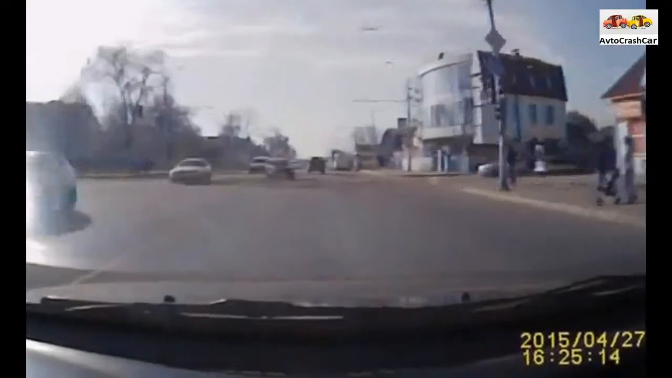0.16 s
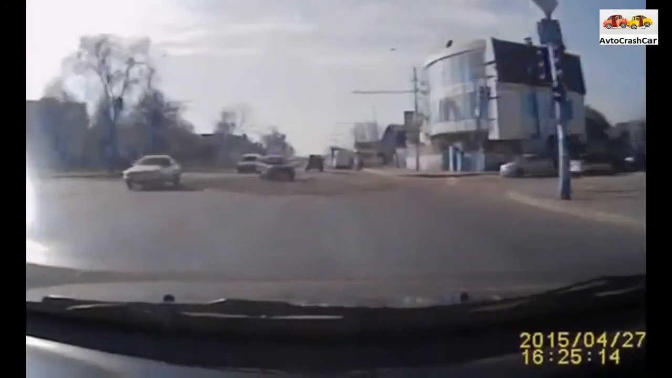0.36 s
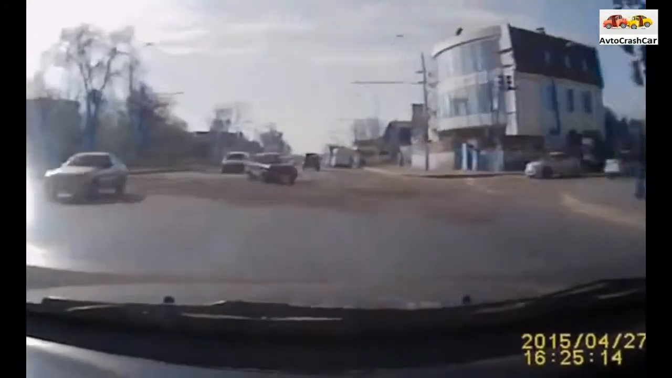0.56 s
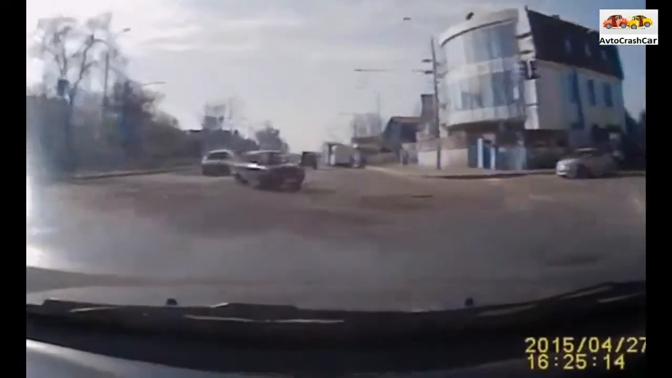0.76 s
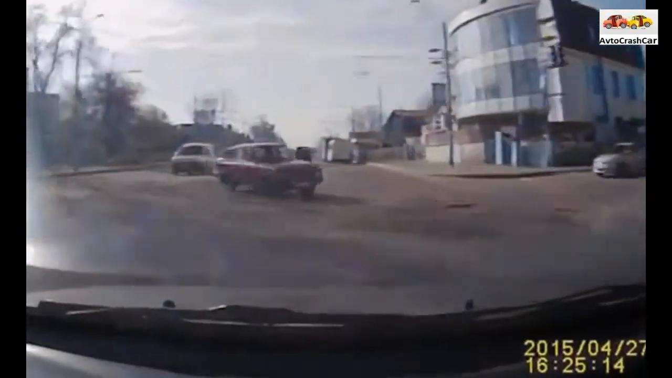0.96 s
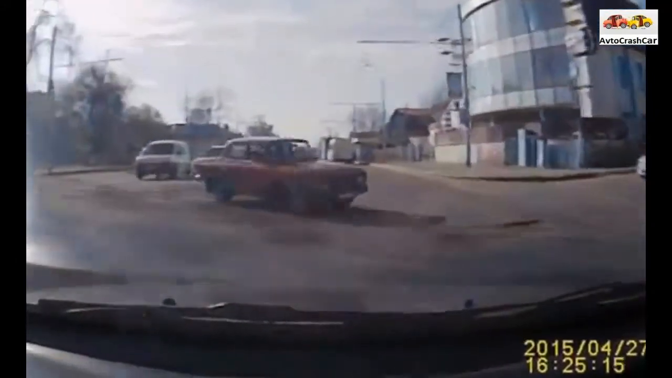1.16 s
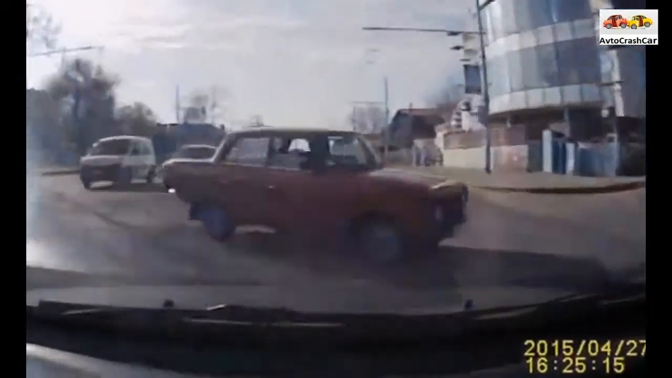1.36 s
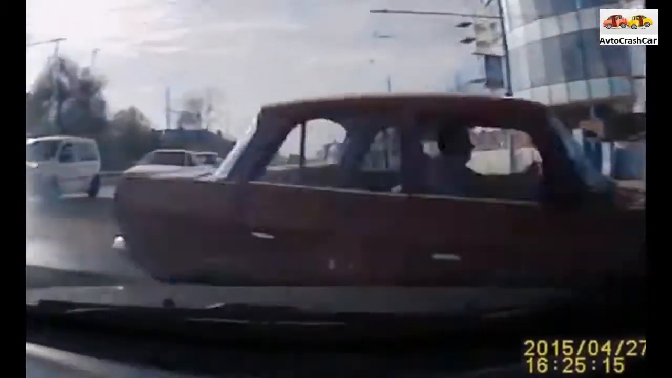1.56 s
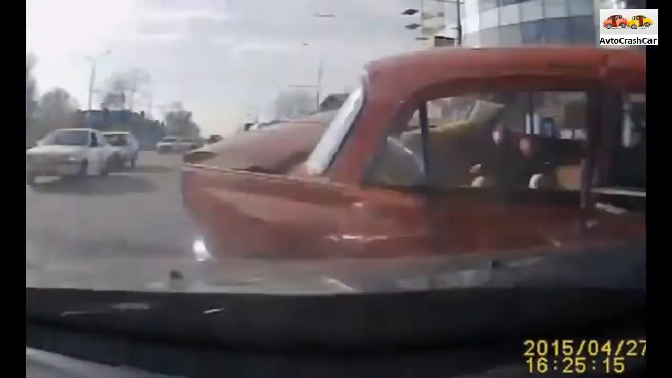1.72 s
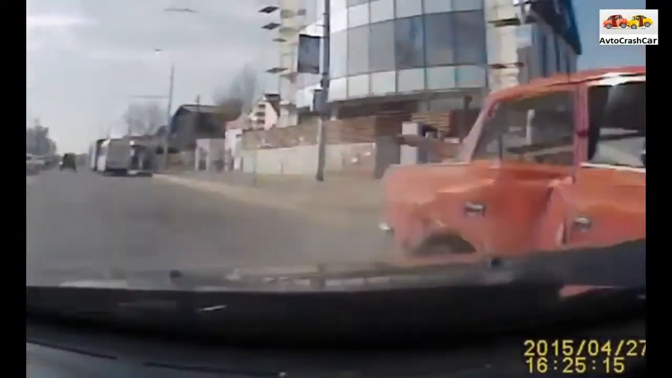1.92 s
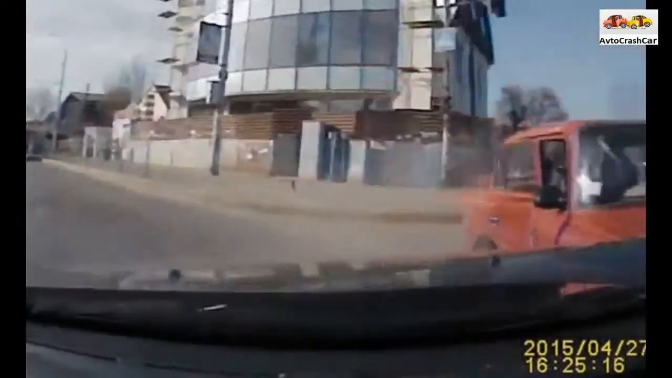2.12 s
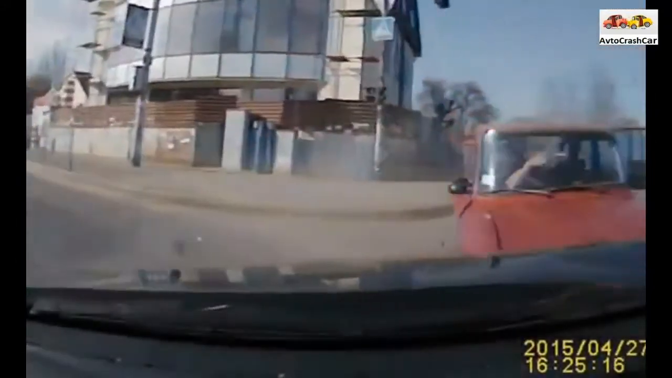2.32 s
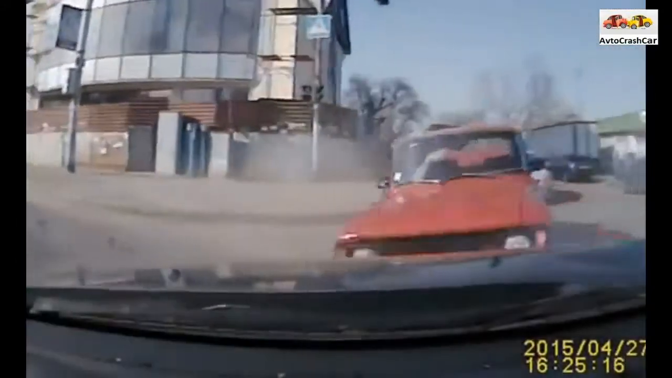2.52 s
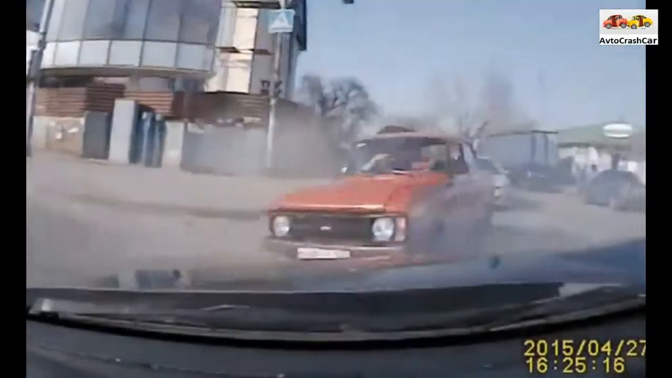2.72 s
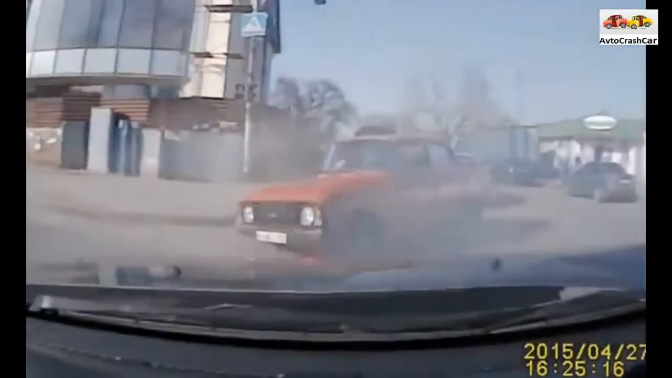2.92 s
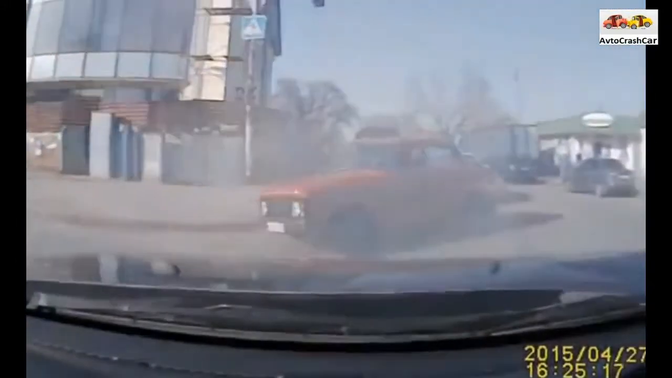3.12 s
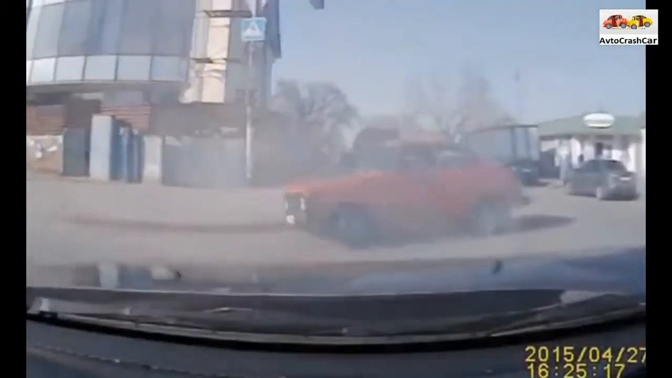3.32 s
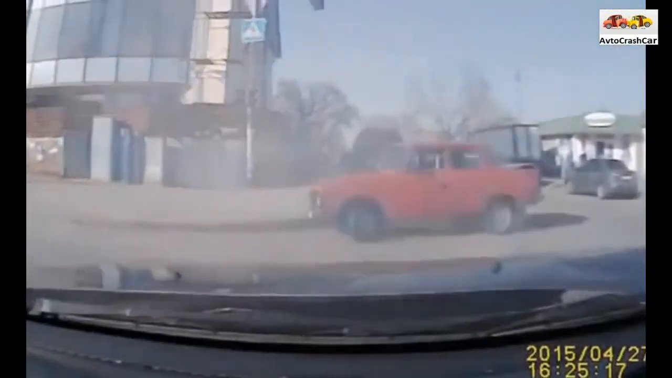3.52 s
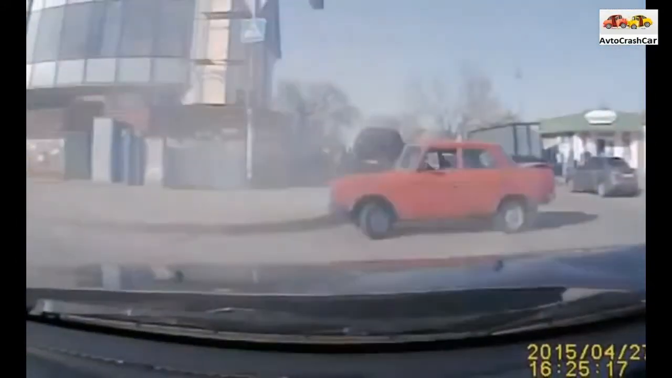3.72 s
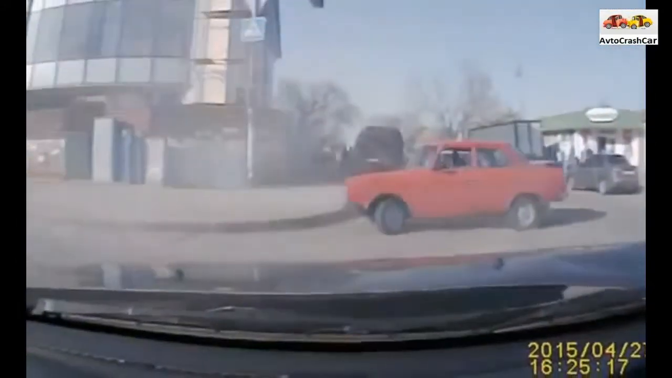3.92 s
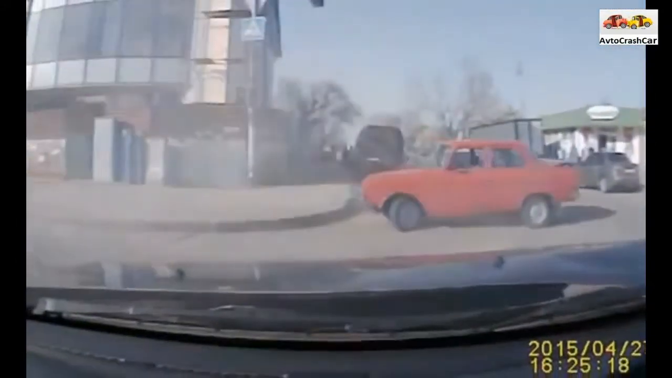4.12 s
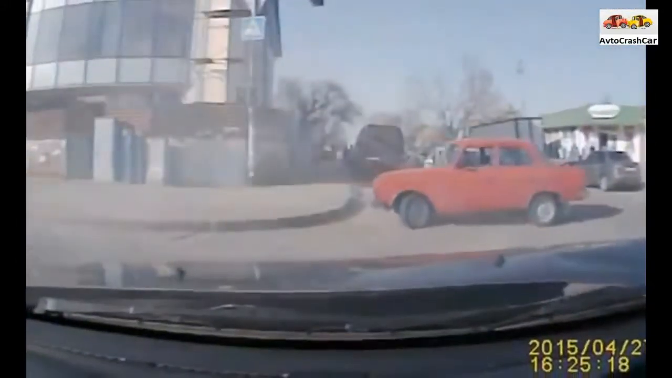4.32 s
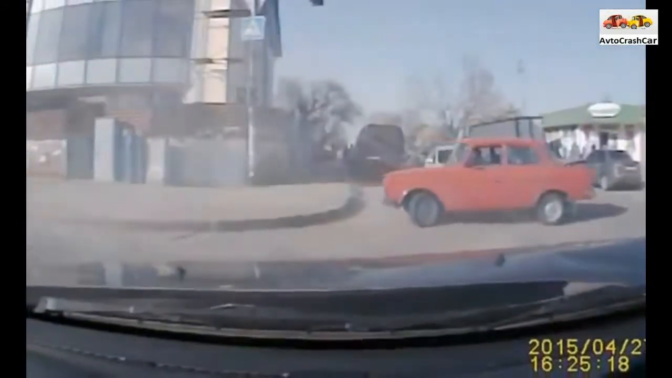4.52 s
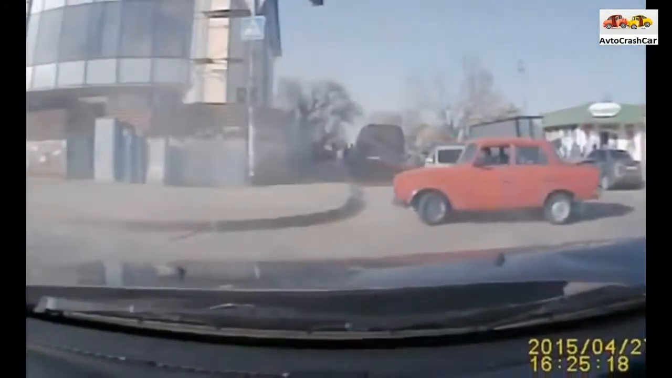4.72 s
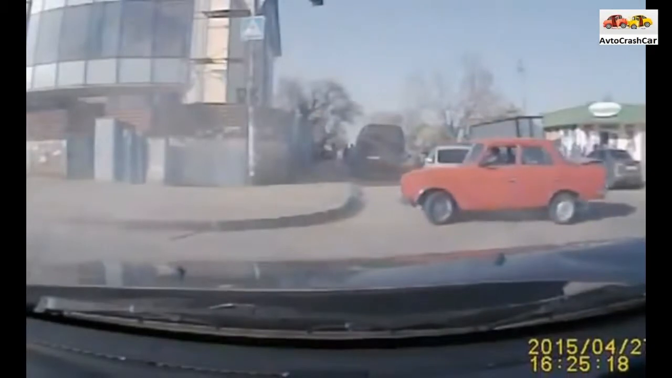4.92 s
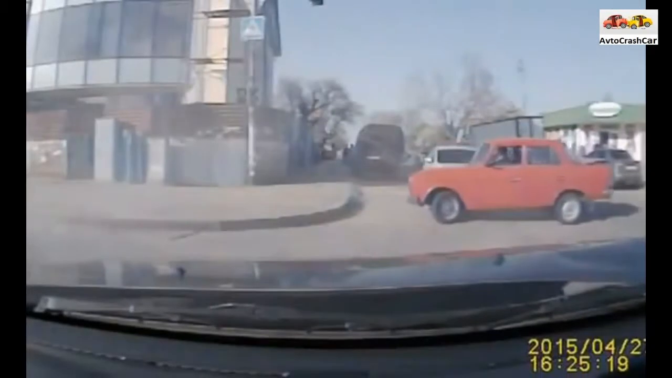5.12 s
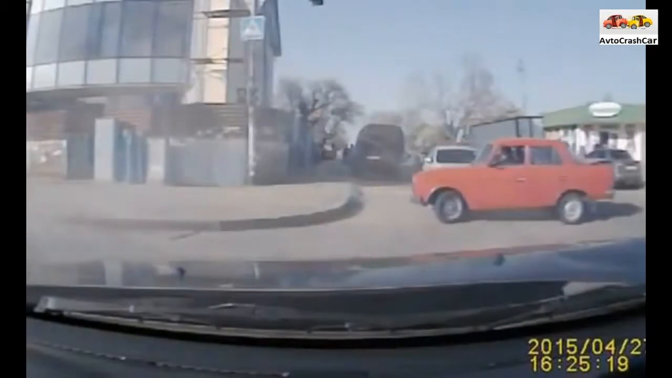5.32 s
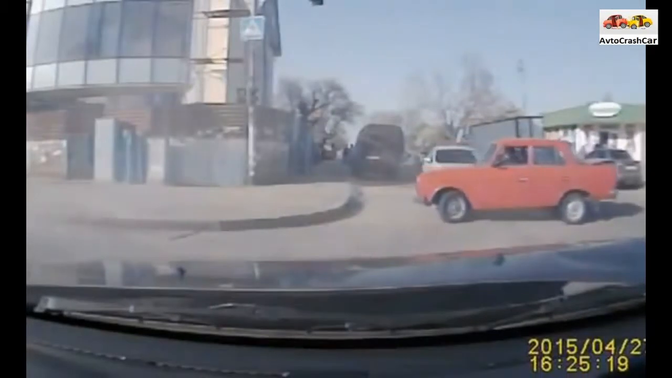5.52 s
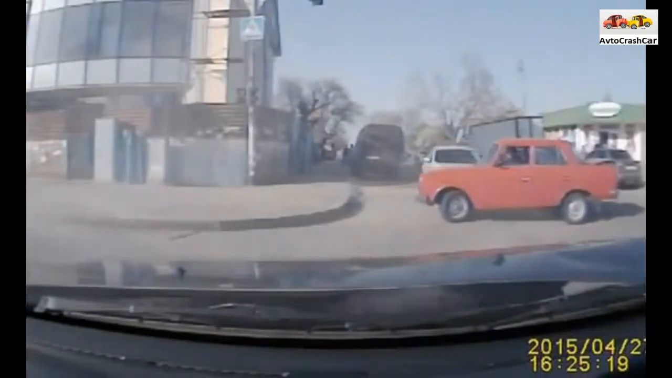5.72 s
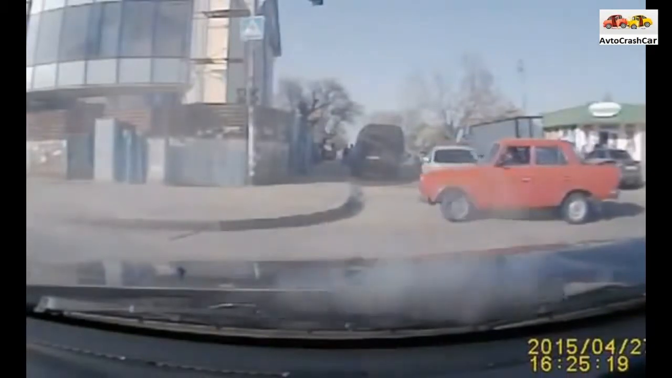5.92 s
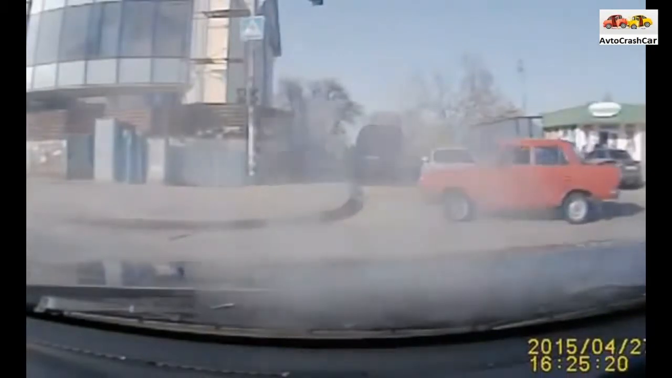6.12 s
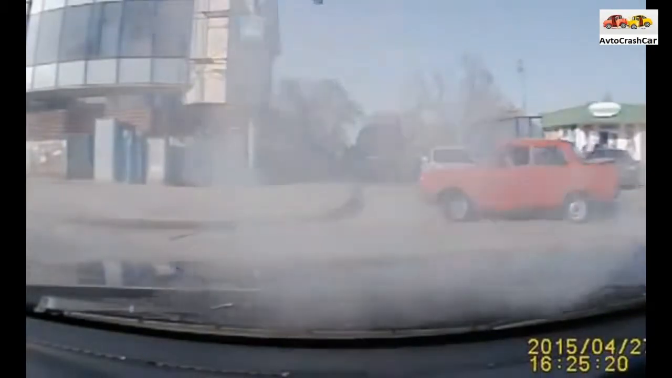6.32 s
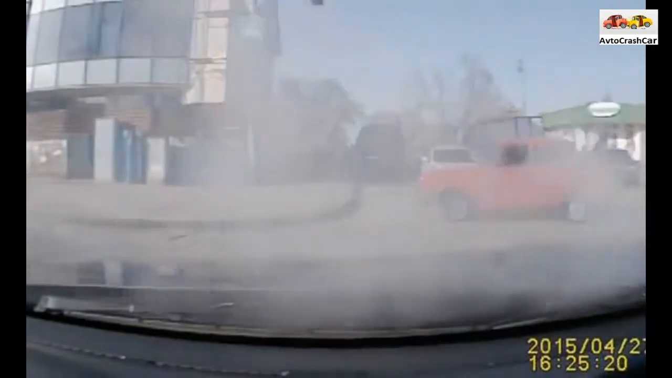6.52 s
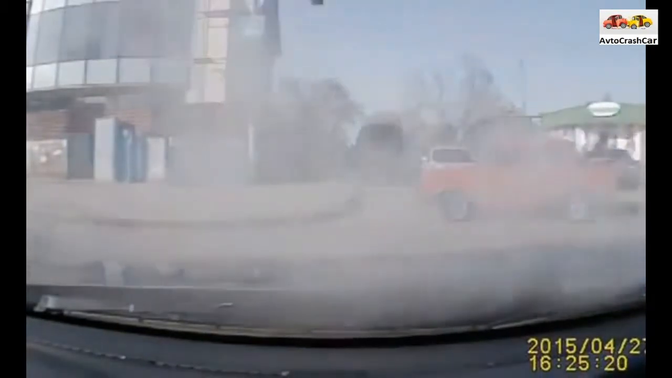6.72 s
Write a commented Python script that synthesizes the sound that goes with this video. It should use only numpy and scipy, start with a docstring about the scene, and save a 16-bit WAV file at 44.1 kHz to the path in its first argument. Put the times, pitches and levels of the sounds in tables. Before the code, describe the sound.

Tyres screech and a horn blares, then a distorted car crash with rattling debris, heard from inside the car as it stops.

```python
"""Screeching tyres and a crash, heard inside a car that brakes hard, skids and hits another car.
The rubber sticks and slips over the road's roar while a horn sounds; then panels crunch, debris rattles.
The noise overloads a small dashboard microphone, and the crash's pressure wave pins it to one side,
so the crunch comes through in spits. The car rolls to a stop with its engine idling and its fan blowing;
at last a door creaks and unlatches."""
import sys
import numpy as np
from scipy import signal
from scipy.fft import rfft, irfft
from scipy.io import wavfile

SR = 44100
rng = np.random.default_rng(int(sys.argv[2]) if len(sys.argv) > 2 else 0)


def wav_out(sig):
    """Save sig, one row per channel (or a flat mono array), as 16-bit PCM at SR to the path in sys.argv[1]."""
    wavfile.write(sys.argv[1], SR, np.round(np.clip(np.atleast_2d(sig).T, -1, 1) * 32767).astype(np.int16))


N = 302967
T = np.arange(N) / SR
FREQS = np.maximum(np.fft.rfftfreq(N, 1 / SR), 1)
BAND_HZ, CUTOFF_HZ = 8100, 15500   # top of the recorder's band; top of the overload's fizz

# The tyres slide. Each row: start in seconds, length in seconds, level in dB, pitch in Hz.
SLIDES = [(0, 0.17, -23, 1096), (.67, 0.97, 0, 1190), (1.92, .35, -4, 1129), (2.35, 0.45, -15.5, 1083),
          (2.78, 0.19, -12.5, 1135), (2.98, 0.27, -16.5, 1148)]
# The four tyres. Each row: pitch as a multiple of the slide's pitch, level in dB.
TYRES = [(.87, -4), (.98, -6.5), (1.07, -2), (1.17, -5.5)]
# Bodywork crumples. Each row: start and length in seconds, level in dB, seconds to fade by 60 dB.
CRUMPLES = [(1.619, 0.03, 5, 0.052), (1.728, .028, 12, 0.061), (1.78, 0.015, 12, 0.032),
            (1.817, 0.016, 19, 0.032), (1.846, 0.047, 14.5, .02), (1.905, 0.059, 7.5, 0.89),
            (2.255, 0.12, 0, 0.09)]
# The tone of the crunch. Each row: frequency in Hz, level in dB.
CRUNCH_COLOUR = [(40, 6.5), (200, 0.5), (500, 4), (1100, 6.5), (1700, 1.5), (2700, -6), (4300, -15),
                 (5700, -13), (8000, -23.5)]
# Road roar swells under braking and dies as the car slows. Each row: time in seconds, level in dB.
ROAD_LEVEL = [(0, -9), (.35, -12), (1.3, -0.5), (1.6, -7.5), (2.35, -4.5), (2.45, -12), (3.0, -23),
              (3.3, -29), (3.45, -23), (3.65, -36.5), (4.6, -35), (6.87, -52)]
# The tone of the road. Each row: frequency in Hz, level in dB.
ROAD_COLOUR = [(20, -4.5), (40, -9), (100, -11.5), (165, -8.5), (250, -7.5), (400, -7.5), (540, -4.5),
               (800, -1.5), (1130, -0.5), (1450, -6.5), (1700, -13), (2150, -15.5), (4200, -40),
               (8000, -35.5)]
# Horn tones that get through the glass. Each row: diaphragm (0 or 1), multiple of its pitch, level in dB.
HORN_PARTIALS = [(0, 1, -5.5), (0, 2, -17), (0, 4, -6), (0, 5, -8.5), (1, 2, 2.5), (1, 3, -2.5),
                 (1, 5, -6.5), (1, 6, -16), (1, 7, -19)]
# Jolts of the body and loose trim. Each row: start and length in seconds, level in dB, treble lift in dB.
KNOCKS = [(0.273, 0.011, 2.5, -20), (0.869, 0.041, -4.5, 13), (.938, .003, -3.5, 14),
          (1.317, 0.0064, 3.5, -19), (1.404, 0.0027, -4, 10), (1.908, .008, 4.5, 16), (2.143, 0.0047, 4, 3),
          (2.39, .002, -8, 7), (2.448, 0.0023, -9, -3), (2.553, 0.0025, 1.5, 8), (2.586, .003, -1.5, 7),
          (2.722, 0.018, -10, 7), (3.066, 0.0053, -10.5, -22), (3.133, 0.024, -13.5, 1),
          (3.175, 0.02, -9.5, -0.5), (3.327, 0.027, -13.5, -8), (3.363, 0.012, 2, -1.5),
          (3.39, 0.057, -21.5, 3), (3.546, 0.0062, -11, -24), (3.954, 0.018, -20.5, -0.5),
          (5.586, 0.066, -28.5, 1.5), (6.063, 0.028, -26, 4), (6.131, 0.012, -17.5, 3),
          (6.625, .002, -21.5, -4)]
# The tone of the jolts. Each row: frequency in Hz, level in dB.
KNOCK_COLOUR = [(30, -13), (70, -17), (120, -8.5), (230, -1), (400, 3.5), (700, 5), (1100, 5.5),
                (1700, -0.5), (2400, -6.5), (3300, -10), (4400, -22.5), (5900, -19), (8000, -28.5)]
# Thumps of the suspension and body. Each row: start in seconds, level in dB, middle pitch in Hz.
THUMPS = [(0.778, -4, 165), (.875, 2.5, 177), (3.332, -10.5, 480), (3.364, -2.5, 429), (3.367, -12, 99),
          (3.958, -34, 201), (6.076, -24, 265), (6.141, -23, 334), (6.418, -30, 229)]
# The tone of the rattle. Each row: frequency in Hz, level in dB.
RATTLE_COLOUR = [(300, -7), (1200, 7), (3000, 0.5), (8000, -17.5)]
# Large glass shards land. Each row: start in seconds, level in dB, pitch in Hz.
SHARDS = [(2.139, -2, 6100), (2.557, 7.5, 5810), (2.624, -15, 5830), (2.866, -19, 5916),
          (3.132, -18.5, 5920)]
# The door creaks. Each row: start in seconds, length in seconds, level in dB.
CREAKS = [(5.557, 0.093, -27.5), (5.6, .01, -14.5), (5.655, 0.031, -25)]
# The latch snaps open. Each row: start in seconds, level in dB.
LATCH_CLICKS = [(6.113, -31), (6.134, -21), (6.141, -14.5), (6.148, -19)]
# The latch's ringing tones. Each row: pitch in Hz, level in dB, seconds to fade by 60 dB.
LATCH_TONES = [(1580, -15, 0.034), (2064, 1.5, 0.037), (2400, -11, 0.022), (3230, -6, 0.03),
               (3470, -7, 0.019), (4700, -8, 0.013)]
# The engine sinks to idle. Each row: time in seconds, firings per second.
ENGINE_SPEED = [(3.5, 36), (4.2, 34), (4.45, 31), (4.8, 30.3)]
# The engine's tones. Each row: multiple of the firing rate, level in dB.
ENGINE_TONES = [(1, 0.5), (2, -25), (3, -25.5), (4, -15.5), (5, -3.5), (7, -9), (12, 0.5)]
# The rush of the fan. Each row: time in seconds, level in dB.
FAN_LEVEL = [(0, -20), (3.5, -20.5), (4.2, -25), (5.2, -26), (6.87, -26)]
# The tone of the fan. Each row: frequency in Hz, level in dB.
FAN_COLOUR = [(26, -35.5), (45, -16), (117, -27), (145, -11.5), (176, -21), (205, -13), (411, -8),
              (499, -8.5), (676, -7), (1020, -2.5), (1480, -7), (1870, -20.5), (2180, -19), (4090, -35.5),
              (8000, -38)]
# The whine of the electrics. Each row: pitch in Hz, level in dB.
WHINE_TONES = [(3098, -59), (3128, -56.5), (6654, -63.5), (7757, -79)]
# Resonances of the cabin and dashboard. Each row: frequency in Hz, width in Hz, full lift in dB.
CABIN = [(148, 38, 5.5), (506.4, 35, 7), (1034, 54, 4.5), (1188, 69, 4.5), (1750, 390, -0.5),
         (2070, 52, 4.5), (3130, 83, 4), (5500, 1350, 9)]


def tyres(wander=.026, rough=.05, flutter_db=5.5, rasp_db=-0.5, bite_flat=.13, bite_s=.13, brake_hz=3190):
    """Each tread sticks and slips near its own pitch; early in the skid the brakes sing thinly too."""
    pitch, level, screech = np.full(N, float(SLIDES[0][3])), 0, 0
    for start, length, db, hz in SLIDES:
        level = level + from_db(db) * envelope(start, length, rise=.07, t60=0.58) ** 2
        # a hard slide starts flat and climbs as the rubber bites
        age = T[T >= start] - start
        pitch[T >= start] = hz * (1 - bite_flat * from_db(db) * np.exp(-age / bite_s))
    apart = np.interp(level, [0, 1], [.45, 1])   # in a light slide the tyres sing closer in pitch
    for ratio, db in TYRES:
        phase = phase_of(pitch * ratio ** apart * (1 + wander * drift(14) + rough * drift(265.9)))
        slip = np.sin(phase) + from_db(-15) * np.sin(2 * phase)
        screech = screech + slip * from_db(db + flutter_db * drift(32) + rasp_db * drift(170))
    brake = np.sin(phase_of(brake_hz * (1 + 0.0055 * drift(55)))) * from_db(-16 + 3.9 * drift(11))
    brake *= np.interp(T, [1.0, 1.3], [1, 0])
    # after the impact the bouncing wheels grip and let go, so the screech stutters
    stutter_db = np.interp(T, [2.2, 2.5], [0, 2.0]) * drift(28)
    return (rms_one(screech) + brake) * level * from_db(stutter_db)


def crunch(clump_db=3.0, lurch_db=1.0):
    """Panels buckle and plastic splinters in dense clumps of snaps, lurch after lurch."""
    snaps = grains(per_s=3000, spread_db=3.0) * from_db(clump_db * drift(100) + lurch_db * drift(26))
    return coloured(snaps, CRUNCH_COLOUR, resonant=0.31) * wreckage()


def wreckage(rise_s=0.00055, debris_at_s=1.83, settle_at_s=3.41, debris_db=-10.5, fall_db_per_s=10):
    """How much is breaking and falling: each crumple, then debris that clatters until the car stops."""
    crumples = sum(from_db(db) * envelope(start, length, rise_s, t60)
                   for start, length, db, t60 in CRUMPLES)
    debris = envelope(debris_at_s, settle_at_s - debris_at_s, rise_s, t60=0.81)
    debris *= from_db(debris_db - fall_db_per_s * (T - debris_at_s))
    return np.hypot(crumples, debris)


def pressure_wave():
    """Air pressure in the cabin rises while the cars are in contact, then leaks away."""
    return 3.78 * envelope(start=1.62, length=0.24, rise=0.026, t60=0.53)


def shudder(level_db=-21, hz=48):
    """The body shell rumbles from the impact until the car has almost stopped."""
    band = signal.butter(2, [hz / 2, hz * 1.66], "band", fs=SR, output="sos")
    shake = rms_one(signal.sosfilt(band, rng.standard_normal(N)))
    return shake * from_db(level_db) * envelope(start=1.65, length=0.26, rise=.15, t60=2.3)


def road():
    """Rolling tyres roar through the body, shaken by bumps in the asphalt."""
    roar = coloured(rng.standard_normal(N), ROAD_COLOUR, resonant=0.28)
    return roar * from_db(in_time(ROAD_LEVEL) + 1.2 * drift(5.7))


def horn(low_hz=402.8, high_hz=489.0, level_db=-13.5):
    """Two thin metal discs, the diaphragms, buzz through the skid."""
    phases = [phase_of(hz * (1 + 0.00134 * drift(8.2))) for hz in (low_hz, high_hz)]
    buzz = sum(from_db(db + 2.0 * drift(8.4)) * np.sin(round(multiple) * phases[round(disc)])
               for disc, multiple, db in HORN_PARTIALS)
    return buzz * from_db(level_db) * envelope(start=0.611, length=1.03, rise=.06, t60=.08)


def knocks(split_hz=2200, rise_s=0.00075, t60=0.066):
    """Each jolt makes loose parts chatter for a moment, some dully and some brightly."""
    chatter = coloured(rng.standard_normal(N), KNOCK_COLOUR, resonant=0.6)
    dull = irfft(rfft(chatter) / (1 + (FREQS / split_hz) ** 4), N)
    treble = chatter - dull
    return sum(from_db(db) * envelope(start, length, rise_s, t60) * (dull + from_db(lift_db) * treble)
               for start, length, db, lift_db in KNOCKS)


def thumps(spread=0.196, t60=0.14):
    """Each bump sets the panels booming at three low pitches, the middle one loudest."""
    return sum(from_db(db) * ping(start, hz * (1 + spread * k), t60) * rng.choice([-1, 1]) / (1 + abs(k))
               for start, db, hz in THUMPS for k in (-1, 0, 1))


def rattle(debris_db=-10, trim_db=-23):
    """Scattered sharp cracks: larger pieces of debris land, and the road shakes loose trim."""
    tick = rng.standard_normal(SR // 20) * envelope(0, 0, rise=1 / SR, t60=0.017)[:SR // 20]
    cracks = coloured(signal.oaconvolve(grains(per_s=70, spread_db=1.8), tick)[:N], RATTLE_COLOUR)
    debris = from_db(debris_db) * np.minimum(wreckage(), .5)
    trim = from_db(trim_db + in_time(ROAD_LEVEL))
    return cracks * (debris + trim)


def glass(t60=0.031, shower_db=-15):
    """Large shards ping one by one; small ones tinkle along with the rest of the debris."""
    large = sum(from_db(db) * ping(start, hz, t60) for start, db, hz in SHARDS)
    small = sum(signal.oaconvolve(grains(per_s=18, spread_db=4.5), ping(0, hz, t60)[:SR // 10])[:N]
                for hz in (1940, 2304, 3210, 4560, 5300, 5650, 5700))
    return large + rms_one(small) * wreckage() * from_db(shower_db)


def door_creak(hz=1206, dip_hz=376, dip_at_s=5.638, dip_s=.026, rough=.035, rasp_db=-7):
    """The door sticks and slips in a short, raspy creak whose pitch dips once."""
    pitch = hz - dip_hz * np.exp(-((T - dip_at_s) / dip_s) ** 2)
    phase = phase_of(pitch * (1 + rough * drift(200)))
    rasp = from_db(rasp_db) * drift(260) * np.cos(phase)
    effort = sum(from_db(db) * envelope(start, length, rise=0.0022, t60=0.12)
                 for start, length, db in CREAKS)
    return (np.sin(phase) + rasp) * effort * from_db(1.8 * drift(90))


def door_latch():
    """The latch snaps open in a few quick clicks, each ringing briefly."""
    return sum(from_db(db + tone_db + rng.normal(0, 2.7)) * ping(start, hz, t60) * (-1) ** k
               for start, db in LATCH_CLICKS for k, (hz, tone_db, t60) in enumerate(LATCH_TONES))


def squeak(at_s=6.0, width_s=0.024, hz=6720, level_db=-42):
    """A tiny high squeak once the car stands still."""
    phase = phase_of(hz * (1 + 0.00576 * drift(145)))
    return from_db(level_db) * np.exp(-((T - at_s) / width_s) ** 2) * np.sin(phase)


def engine(level_db=-49, sway_db=4, ajar_db=-6):
    """The firing throb and its multiples boom in the cabin; the unlatched door lets the deepest out."""
    phase = phase_of(in_time(ENGINE_SPEED) * (1 + 0.014 * drift(11)))
    ajar = envelope(start=5.97, length=.7, rise=.12, t60=.12)
    throb = 0
    for multiple, db in ENGINE_TONES:
        gain = from_db(db + sway_db * drift(7) + ajar_db * ajar / multiple)
        throb = throb + gain * np.sin(round(multiple) * phase + rng.uniform(0, 2 * np.pi))
    return np.sqrt(2) * throb * from_db(level_db)


def fan():
    """Air rushes through the dashboard."""
    return coloured(rng.standard_normal(N), FAN_COLOUR) * from_db(in_time(FAN_LEVEL) + 1.2 * drift(58))


def whine():
    """The electrics give off faint, nearly steady tones."""
    return sum(np.sqrt(2) * from_db(db) * np.sin(phase_of(hz + 6.0 * drift(30)))
               for hz, db in WHINE_TONES)


def envelope(start, length, rise, t60):
    """Rise, hold until the length is over, then fade by 60 dB every t60; all in seconds."""
    age = T - start
    return np.clip(age / rise, 0, 1) * np.exp(-np.log(1000) * np.clip((age - length) / t60, 0, 10))


def ping(start, hz, t60):
    """A struck part rings at one pitch and fades by 60 dB in t60 seconds."""
    out, span = np.zeros(N), slice(int(start * SR), int((start + 2 * t60) * SR))
    age = T[span] - T[span][0]
    out[span] = np.exp(-np.log(1000) * age / t60) * np.sin(2 * np.pi * hz * age)
    return out


def grains(per_s, spread_db):
    """Random snaps of very unequal size."""
    sizes = from_db(spread_db * np.minimum(rng.exponential(1, N), 4)) * rng.choice([-1, 1], N)
    return rms_one(sizes * (rng.random(N) < per_s / SR))


def coloured(x, colour, resonant=1):
    """Give x a broad tone and a share of the cabin's resonances, at an average power of 1."""
    hz, db = np.transpose(colour)
    shape_db = np.interp(np.log(FREQS), np.log(hz), db)
    shape_db -= 20 * np.log10(1 + (16 / FREQS) ** 4)   # cut rumble below 16 Hz
    for centre, width, lift in CABIN:
        shape_db += resonant * lift / (1 + (2 * (FREQS - centre) / width) ** 2)
    return rms_one(low_pass(irfft(rfft(x) * from_db(shape_db), N), BAND_HZ))


def low_pass(x, hz):
    """Steeply cut everything above hz."""
    return signal.sosfilt(signal.ellip(10, .2, 80, hz, fs=SR, output="sos"), x)


def drift(hz):
    """A random wobble of typical size 1, mostly slower than hz."""
    return rms_one(irfft(rfft(rng.standard_normal(N)) / (1 + (FREQS / hz) ** 2), N))


def phase_of(hz):
    """The running angle of a tone whose pitch changes."""
    return 2 * np.pi * np.cumsum(hz) / SR


def in_time(rows):
    """Join (time, value) points with straight lines."""
    times, values = np.transpose(rows)
    return np.interp(T, times, values)


def from_db(db):
    """Turn decibels into a gain."""
    return 10 ** (np.asarray(db) / 20)


def rms_one(x):
    """Scale to an average power of 1."""
    return x / np.sqrt(np.mean(x ** 2) + 1e-20)


def scene():
    """All the sounds together; the knocks, pings and clicks are cut off above the recorder's band."""
    driving = road() + tyres() + horn() + engine() + fan() + whine()
    crash = crunch() + shudder() + pressure_wave()
    struck = knocks() + rattle() + glass() + thumps() + door_creak() + door_latch() + squeak()
    return (driving + crash + low_pass(struck, BAND_HZ))[None]


def record(dry, ceiling=0.71, knee=2.26, sag_hz=2.1, leak_db=-13.0, top_leak_db=-8):
    """The microphone overloads and lets held pressure sag to zero; the recorder clips the peaks again."""
    pinned = dry / (1 + np.abs(dry / ceiling) ** knee) ** (1 / knee)
    sag = signal.butter(1, sag_hz, "high", fs=SR, output="sos")
    sagged = signal.sosfilt(sag, signal.sosfilt(sag, pinned))
    # only a little of the overload's fizz passes above the recorder's band
    passed = np.interp(FREQS, [BAND_HZ - 300, BAND_HZ + 400, CUTOFF_HZ],
                       from_db([0, leak_db, top_leak_db]))
    narrowed = irfft(rfft(sagged) * passed, N)
    return low_pass(np.clip(narrowed, -1, 1), CUTOFF_HZ)


dry = scene()
out = record(dry)
wav_out(out)
```